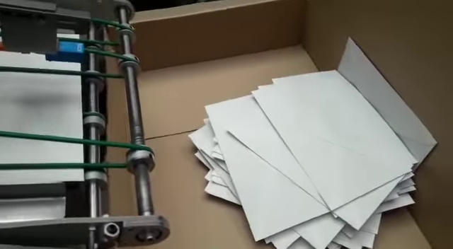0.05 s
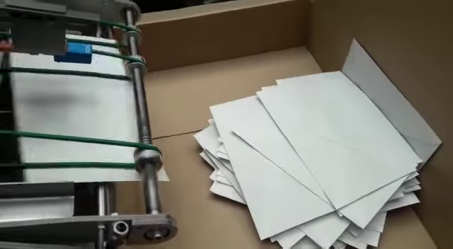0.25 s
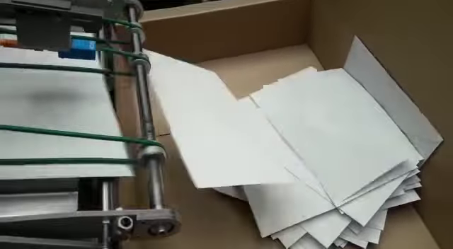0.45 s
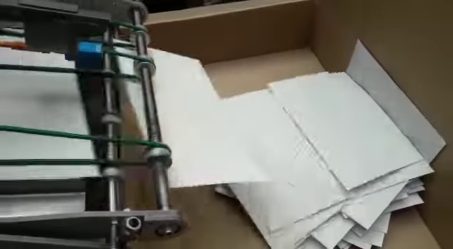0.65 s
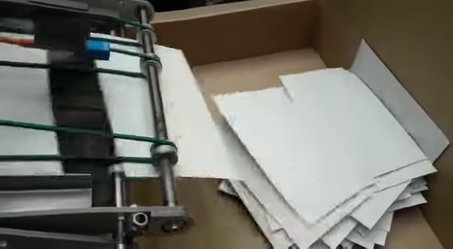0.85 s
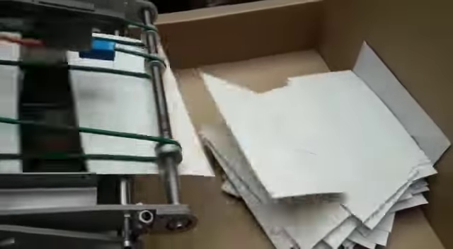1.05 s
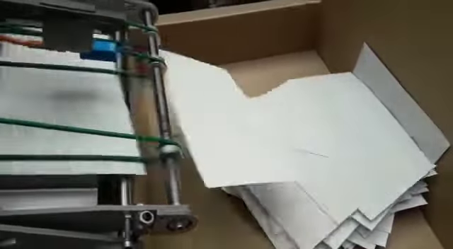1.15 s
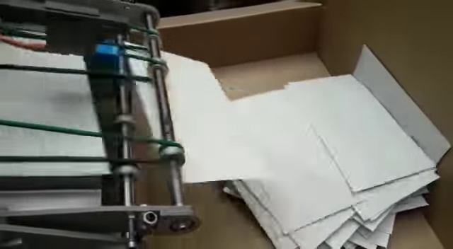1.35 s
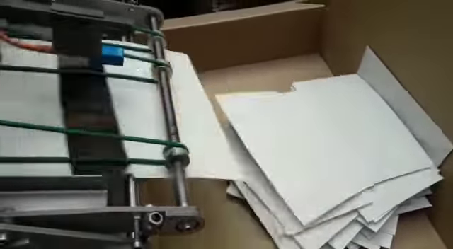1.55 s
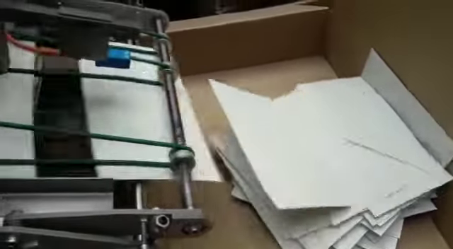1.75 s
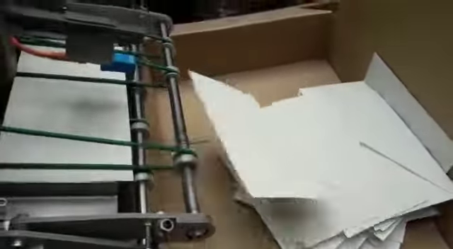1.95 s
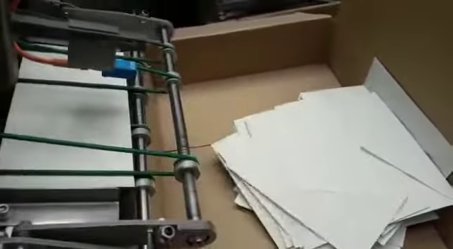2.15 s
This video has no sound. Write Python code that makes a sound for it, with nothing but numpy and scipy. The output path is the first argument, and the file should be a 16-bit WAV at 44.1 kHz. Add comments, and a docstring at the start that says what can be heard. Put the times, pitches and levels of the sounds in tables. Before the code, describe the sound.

A belt conveyor starts with a small squeak, then whirs, whines and rattles close by in a workshop. Paper sheets hiss along and land in a cardboard box with soft thumps and snaps before the machine brakes.

```python
"""A belt conveyor starts, feeds paper sheets into a cardboard box and brakes, close by in a workshop.
Its drive teeth sing and waver with the turning rollers, the motor whines, one roller drags, and
bearings and belts rattle through the rumbling frame. The belts slip and squeak at start and stop.
Sheets hiss along, thump the box into its low modes and snap at their edges.
Idle machinery hums underneath."""
import sys
import numpy as np
from scipy import signal
from scipy.fft import rfft, irfft, next_fast_len
from scipy.io import wavfile
from scipy.ndimage import map_coordinates

SR = 44100
rng = np.random.default_rng(int(sys.argv[2]) if len(sys.argv) > 2 else 0)


def inscribe(sig):
    """Save sig as 16-bit PCM at rate SR to the path in sys.argv[1].

    A 1-D sig is mono; a 2-D sig holds one channel per row.
    Samples are clipped to [-1, 1] before scaling.
    """
    pcm = np.round(np.clip(np.atleast_2d(sig).T, -1, 1) * 32767)
    wavfile.write(sys.argv[1], SR, pcm.astype(np.int16))


N = 97020


def amp(db):
    """Decibels to gain."""
    return 10 ** (np.asarray(db) / 20)


def unit(x):
    """Scale to rms 1."""
    return x / np.sqrt(np.mean(x ** 2) + 1e-20)


def along(points, hz):
    """Interpolate (Hz, value) points on a log axis."""
    point_hz, values = np.transpose(points)
    return np.interp(np.log(hz + 1), np.log(point_hz + 1), values)


def clock():
    """Sample times in seconds."""
    return np.arange(N) / SR


def curve(rows):
    """Interpolate (s, value) points at every sample."""
    return np.interp(clock(), *np.transpose(rows))


def wobble(knots_per_s):
    """Smooth random curve, rms near 1."""
    return map_coordinates(rng.standard_normal(4096), [clock() * knots_per_s], mode="wrap")


def filtered(x, response):
    """Apply a gain given as a function of Hz."""
    size = next_fast_len(N + SR // 2)
    return irfft(rfft(x, size) * response(np.fft.rfftfreq(size, 1 / SR)), size)[:N]


def coloured(x, spectrum):
    """Shape x by (Hz, dB) points, at rms 1."""
    return unit(filtered(x, lambda hz: amp(along(spectrum, hz))))


def noise(spectrum):
    """Coloured noise, rms 1."""
    return coloured(rng.standard_normal(N), spectrum)


def tone(hz):
    """Sine following a pitch curve, rms 1."""
    return np.sqrt(2) * np.sin(2 * np.pi * (np.cumsum(hz * np.ones(N)) / SR + rng.random()))


def add(track, start_s, sound):
    """Mix a sound in at start_s."""
    part = track[round(start_s * SR):][:len(sound)]
    part += sound[:len(part)]


ROLLER_TURN_HZ, PULLEY_TURN_HZ = 5.41, 9.09
# Drive speed. Each row: time in seconds, share of full speed.
DRIVE_SPEED = [(.198, 0.29), (.25, 0.89), (.31, 0.99), (1.858, 1), (1.88, 1), (1.9, .4)]
# Frame response, for teeth and rattle. Each row: frequency in Hz, relative gain in dB.
FRAME_RESPONSE = [(240, -11), (400, -16.5), (653, -13.5), (749, -17), (957, -3), (1030, -6.5),
                  (1380, -10.5), (1910, -7), (2120, -8.5), (2220, -6), (2400, -3.5), (2670, -4.5),
                  (2880, -7.5), (3850, -17.5), (15500, -41.5)]
# Tooth harmonics. Each row: multiple, relative level in dB, swell in dB, swell peak in roller turns.
TOOTH_HARMONICS = [(1, -53, 1, .2), (2, -54, 1, .5), (4, -48, 1.5, .4), (5, -48, 1.5, .4),
                   (6, -40.5, 3.5, .24), (7, -39.5, 4, .35), (8, -38, 3.5, .83), (9, -45, 2, .3),
                   (10, -46, 2, .2), (11, -50, 2, .3), (14, -55, 2, .5)]


def teeth(tooth_hz=326.0, blur_hz=13, swing_db=1.8, pulley_fastest_s=.395):
    """The tooth tone sways with pulley and roller; each harmonic swells once per roller turn."""
    t = clock()
    pulley_sway = .007 * np.cos(2 * np.pi * PULLEY_TURN_HZ * (t - pulley_fastest_s))
    roller_sway = .002 * np.cos(2 * np.pi * ROLLER_TURN_HZ * t)
    hz = tooth_hz * curve(DRIVE_SPEED) * (1 + pulley_sway + roller_sway + .003 * wobble(39.51))
    out = np.zeros(N)
    for k, db, swell_db, peak_turns in TOOTH_HARMONICS:
        turn_db = swell_db * np.cos(2 * np.pi * (ROLLER_TURN_HZ * t - peak_turns))
        frame_db = along(FRAME_RESPONSE, k * hz) - along(FRAME_RESPONSE, k * tooth_hz)
        gain = amp(db + turn_db + frame_db + swing_db * wobble(45.3))
        out += gain * tone(k * hz + blur_hz * wobble(130))
    return out


# Frame resonances. Each row: centre in Hz, width in Hz, boost in dB.
FRAME_RESONANCES = [(2960, 62, 0.5), (3260, 83, 1), (3554, 120, 6.5), (4620, 150, 4)]


def rattle(ticks_per_s=3000, tick_share=.6, level_db=-30.5, swing_db=1.2):
    """Dense ticks of bearings and belts sound through the frame and its resonances."""
    def resonance_gain(f):
        return amp(sum(db / (1 + (2 * (f - hz) / width) ** 2) for hz, width, db in FRAME_RESONANCES))

    ticks = unit((rng.random(N) < ticks_per_s / SR) * rng.standard_normal(N))
    contact = np.sqrt(tick_share) * ticks + np.sqrt(1 - tick_share) * rng.standard_normal(N)
    ringing = filtered(contact, resonance_gain)
    return amp(level_db + swing_db * wobble(45)) * coloured(ringing, FRAME_RESPONSE)


def motor(whine_hz=2748, level_db=-33.5, swing_db=1.4):
    """The motor gives a thin, steady whine."""
    return amp(level_db + swing_db * wobble(24.896)) * tone(whine_hz + 1.78 * wobble(29.4))


def roller(note_hz=970, level_db=-39.5, hard_drag_s=.758):
    """A roller drags twice a turn, once hard and once lightly: its note sags and swells each time."""
    turn_rad = 2 * np.pi * ROLLER_TURN_HZ * (clock() - hard_drag_s)
    drag = (np.cos(turn_rad) + .85 * np.cos(2 * turn_rad)) / np.sqrt(2)
    hz = note_hz - 19 * drag + 10 * wobble(120)
    return amp(level_db + 6 * drag + wobble(50.1)) * curve(DRIVE_SPEED) ** 2 * tone(hz)


# Belt slips. Each row: start in seconds, length in seconds, first and last pitch in Hz, level in dB.
BELT_SLIPS = [(.197, 0.015, 1880, 2050, -29.5), (0.213, 0.041, 2420, 2420, -27.5),
              (0.234, 0.024, 1830, 1750, -33), (1.864, 0.0186, 2200, 1300, -30.5),
              (1.868, .024, 1040, 810, -29), (1.877, .012, 850, 505, -34)]


def squeaks(roughness_hz=35):
    """The belts slip in short, rough glides as they take up speed and brake."""
    out = np.zeros(N)
    for start_s, length_s, first_hz, last_hz, db in BELT_SLIPS:
        progress = np.clip((clock() - start_s) / length_s, 0, 1)
        hz = first_hz + (last_hz - first_hz) * progress + roughness_hz * wobble(500)
        out += amp(db) * np.sin(np.pi * progress) * tone(hz)
    return out


# Frame rumble. Each row: frequency in Hz, relative density in dB.
RUMBLE_SPECTRUM = [(25, -61), (60, -27.5), (90, -17), (120, -13.5), (170, 8), (215, 1.5), (270, -6.5),
                   (450, -9.5), (800, -35), (3000, -83)]
# The rumble outlasts the drive. Each row: time in seconds, level in dB.
RUMBLE_ENVELOPE = [(.195, -62), (.215, -52), (.95, -46), (1.8, -53.5), (1.91, -37), (1.98, -48.5),
                   (2.06, -57.5), (2.2, -61)]


def frame(stop_s=1.885, ring_hz=2597, ring_db=-47, t60_s=.6):
    """The frame rumbles unevenly under the rollers and rings faintly once they stop."""
    age_s = np.maximum(clock() - stop_s, 0)
    ring = (age_s > 0) * amp(ring_db - 60 * age_s / t60_s) * tone(ring_hz + 12 * wobble(80.1))
    rumble = amp(curve(RUMBLE_ENVELOPE) + 1.36 * wobble(16)) * noise(RUMBLE_SPECTRUM)
    return ring + rumble


# Sheets striking the box. Each row: start in seconds, gain in dB, mode tilt in dB per octave.
SHEET_IMPACTS = [(.216, -30.5, 4.5), (.472, -18.5, 3.5), (.512, -17, 3.5), (0.628, -29.5, -1),
                 (0.756, -25.5, 1), (0.957, -32, 0), (1.254, -19, 3.5), (1.334, -31.5, -10),
                 (1.396, -19, -5.5), (1.482, -36, 1), (1.678, -22.5, 0), (1.884, -35, 9)]
# Box modes. Each row: frequency in Hz, relative level in dB, T60 in seconds.
BOX_MODES = [(63.7, -28, 0.11), (99, -18.5, 0.18), (163.6, -8, 0.17), (181.4, -11.5, 0.16),
             (318, -6, 0.072), (362, -7.5, 0.047), (446, -9, 0.043), (616, -13, 0.03), (655, -23, 0.034)]
# Air puff. Each row: frequency in Hz, relative density in dB.
PUFF_SPECTRUM = [(25, -40), (50, -24), (100, -36), (180, 16.5), (300, 5), (600, -6.5), (1200, -9),
                 (4000, -74)]


def thumps(attack_s=0.0017, puff_db=-9, puff_t60_s=0.18):
    """Each sheet knocks the box into its low modes and pushes out a puff of air."""
    out, t = np.zeros(N), np.arange(SR // 3) / SR
    for start_s, db, tilt_db_per_oct in SHEET_IMPACTS:
        ring = np.zeros(len(t))
        for hz, mode_db, t60_s in BOX_MODES:
            struck_db = mode_db + tilt_db_per_oct * np.log2(hz / 160) + rng.normal(0, 1)
            ring += amp(struck_db - 60 * t / t60_s) * np.sin(2 * np.pi * hz * t)
        puff = amp(puff_db - 60 * t / puff_t60_s) * noise(PUFF_SPECTRUM)[:len(t)]
        add(out, start_s, amp(db) * (ring + puff) * (1 - np.exp(-t / attack_s)))
    return out


# Edge snaps. Each row: start in seconds, peak in dB, pitch in Hz, T60 in seconds.
EDGE_SNAPS = [(.248, -17, 4500, .03), (.4892, -7, 3600, .009), (.4925, -19, 6000, .008),
              (.6142, -13, 4600, .02), (.7186, -6, 3600, .006), (.838, -22, 6500, .01),
              (1.278, -22, 4800, .012), (1.3893, -14, 4300, .014), (1.413, -22, 3300, .01),
              (1.498, -25, 6000, .012), (1.756, -24, 5000, .012), (1.922, -26, 7000, .022),
              (1.939, -27, 4000, .02), (1.977, -40, 8000, .015), (2.011, -36, 8000, .015)]
# Base colour of a snap. Each row: frequency in Hz, relative density in dB.
SNAP_SPECTRUM = [(500, 0), (1500, 4), (3200, 8), (4500, -0.5), (5500, -3), (8000, -2.5), (12000, -14.5),
                 (16000, -31)]


def snaps(boost_db=6, width_oct=.35):
    """A paper edge lets go with a very short, bright crack, boosted around its own pitch."""
    out, t = np.zeros(N), np.arange(SR // 20) / SR
    hz = np.geomspace(400, 16000, 32)
    for start_s, peak_db, pitch_hz, t60_s in EDGE_SNAPS:
        bump_db = boost_db * np.exp(-(np.log2(hz / pitch_hz) / width_oct) ** 2)
        spectrum = np.column_stack([hz, along(SNAP_SPECTRUM, hz) + bump_db])
        crack = amp(-60 * t / t60_s) * noise(spectrum)[:len(t)]
        add(out, start_s, amp(peak_db) * crack / np.abs(crack).max())
    return out


# Sliding paper. Each row: time in seconds, gain in dB.
SLIDE_ENVELOPE = [(.195, -66), (.205, -5), (.24, 2), (.4, 1), (1.0, 1), (1.87, 3), (1.885, 3.5),
                  (1.915, -17), (1.935, 5.5), (1.96, -16), (2.0, -5), (2.06, -16), (2.2, -37)]
# Paper hiss. Each row: frequency in Hz, relative density in dB.
PAPER_SPECTRUM = [(1500, -27), (4000, -6.5), (7500, 3.5), (10000, -4), (13000, -3), (16000, -11)]


def paper(hiss_db=-47, flicks_per_s=22, flick_db=-42, flick_t60_s=.04):
    """Sheets hiss over the belts with small random flicks, then settle on the pile."""
    impulses = (rng.random(N) < flicks_per_s / SR) * rng.uniform(0.24, 1, N)
    decay = amp(-60 * clock()[:SR // 10] / flick_t60_s)
    hiss = amp(hiss_db + 1.25 * wobble(25) + 1.9 * wobble(400)) * noise(PAPER_SPECTRUM)
    flicks = amp(flick_db) * signal.fftconvolve(impulses, decay)[:N] * noise(PAPER_SPECTRUM)
    return amp(curve(SLIDE_ENVELOPE)) * (hiss + flicks)


# Machinery hum. Each row: frequency in Hz, level in dB.
HUM_TONES = [(197, -67.5), (500.6, -63.5), (807.5, -66.5), (872, -65.5), (1308, -67), (1615, -64),
             (1809, -70)]
# Idle noise. Each row: frequency in Hz, relative density in dB.
IDLE_SPECTRUM = [(18, -48), (30, -18.5), (208, -5), (410, -4.5), (455, 1.5), (546, -39), (591, 0),
                 (639, -5.5), (830, -4.5), (1230, -11), (1640, -2), (1910, -5), (3780, -19.5), (11900, -29),
                 (15500, -45)]
# Idle noise level. Each row: time in seconds, level in dB.
IDLE_ENVELOPE = [(0, -50.5), (.2, -52.5), (1.9, -58), (2.1, -46.5), (2.2, -49.5)]
# Pulsing high hiss. Each row: frequency in Hz, relative density in dB.
FLUTTER_SPECTRUM = [(5000, -30), (8000, -6), (9800, -10), (11500, -1), (13500, -11), (16000, -18)]


def idle(flutter_hz=21.35, flutter_peak_s=.024, flutter_db=-60):
    """Workshop machinery hums; a faint high hiss pulses evenly."""
    hum = sum(amp(db + 3.4 * wobble(10.7)) * tone(hz + 3 * wobble(20)) for hz, db in HUM_TONES)
    floor = amp(curve(IDLE_ENVELOPE)) * noise(IDLE_SPECTRUM)
    pulse = (.5 + .5 * np.cos(2 * np.pi * flutter_hz * (clock() - flutter_peak_s))) ** 0.77
    return hum + floor + amp(flutter_db) * pulse * noise(FLUTTER_SPECTRUM)


# Workshop decay. Each row: frequency in Hz, T60 in seconds.
ROOM_DECAY = [(150, 0.12), (1000, 0.76), (3000, 0.41), (12000, 0.37)]


def room(x):
    """The workshop reverberates, each frequency dying at its own rate."""
    hz, t, bins = signal.stft(rng.standard_normal(SR // 2), SR, nperseg=256)
    decay = amp(-60 * t / along(ROOM_DECAY, hz)[:, None])
    tail = signal.istft(bins * decay, SR, nperseg=256)[1]
    return signal.fftconvolve(x, tail / np.linalg.norm(tail))[:N]


# Drive from start to stop. Each row: time in seconds, gain in dB.
DRIVE_ENVELOPE = [(.193, -61), (.201, -4), (.235, 1.5), (.26, 2.5), (.285, -2.5), (.33, -0.5), (1.1, -0.5),
                  (1.84, -0.5), (1.878, -2), (1.892, -30), (1.93, -15.5), (2.0, -52)]


def scene(drive_room_db=-8.5, hit_room_db=-13.5):
    """Conveyor, sheets and idle hum in mono; teeth, rattle and short hits feed the room."""
    drive_gain = amp(curve(DRIVE_ENVELOPE))
    drive = drive_gain * (teeth() + rattle())
    whine = drive_gain * (motor() + roller())
    hits = thumps() + snaps() + squeaks()
    direct = drive + whine + hits + frame() + paper() + idle()
    return (direct + amp(drive_room_db) * room(drive) + amp(hit_room_db) * room(hits))[None]


def record(dry, low_cut_hz=52, top_hz=15900):
    """The microphone loses the deep bass; nothing passes above top_hz."""
    highpass = signal.butter(4, low_cut_hz, "highpass", fs=SR, output="sos")
    thinned = signal.sosfilt(highpass, dry[0])
    return filtered(thinned, lambda hz: hz < top_hz)[None]


dry = scene()
out = record(dry)
inscribe(out)
```